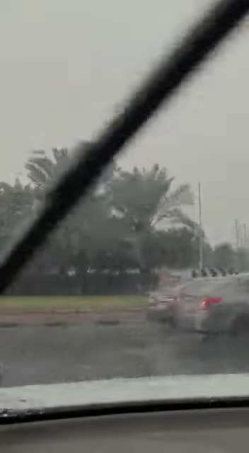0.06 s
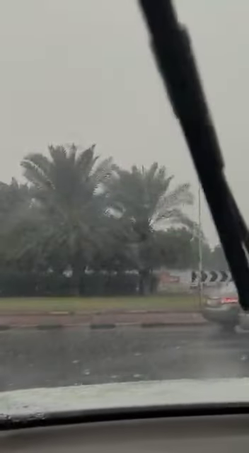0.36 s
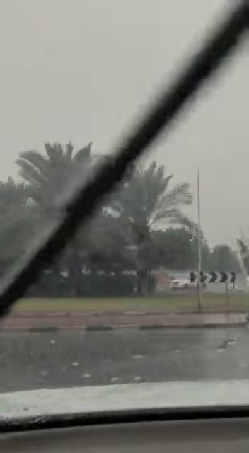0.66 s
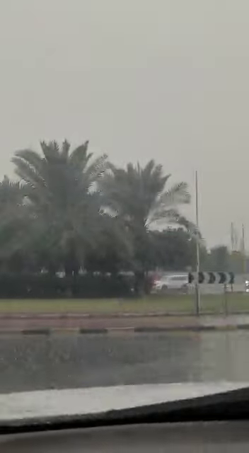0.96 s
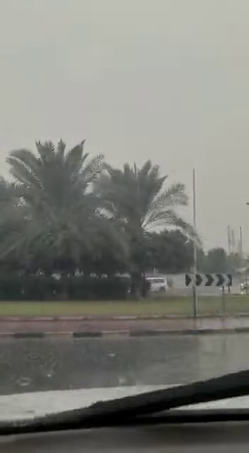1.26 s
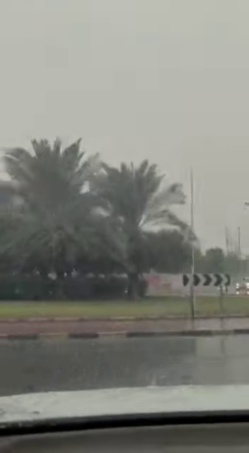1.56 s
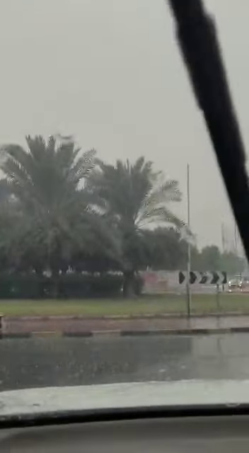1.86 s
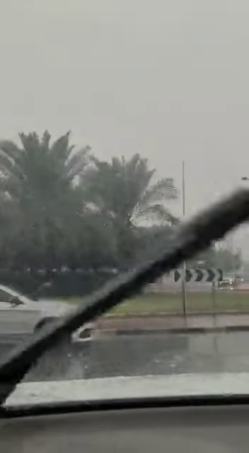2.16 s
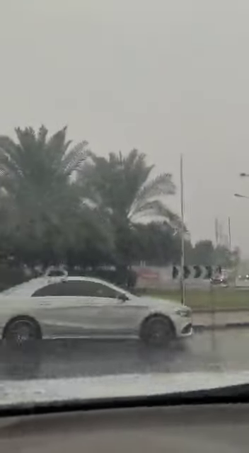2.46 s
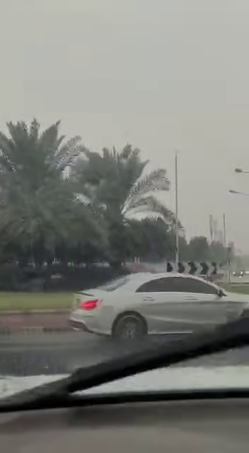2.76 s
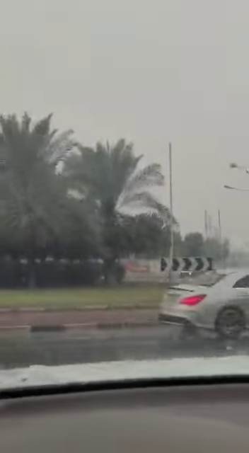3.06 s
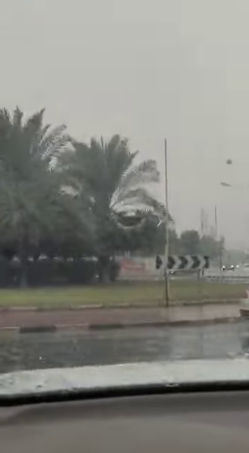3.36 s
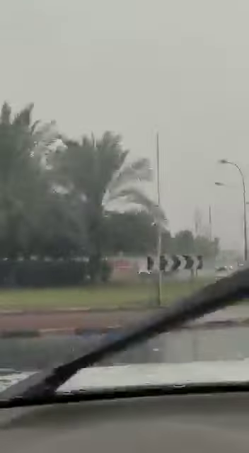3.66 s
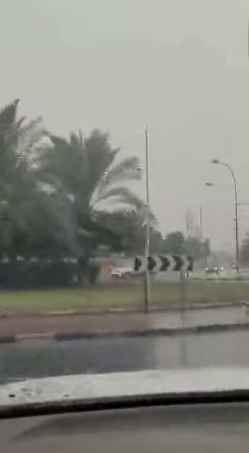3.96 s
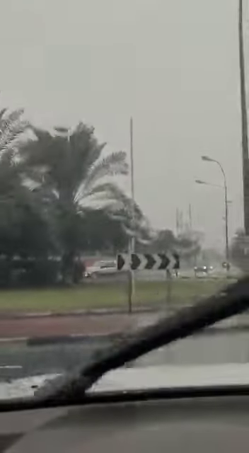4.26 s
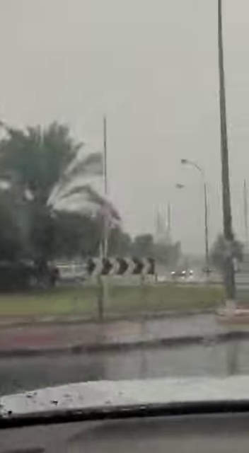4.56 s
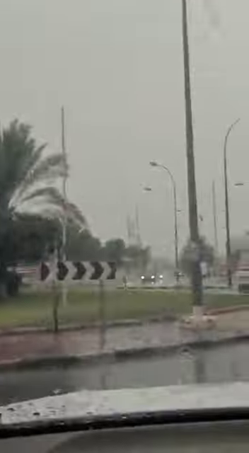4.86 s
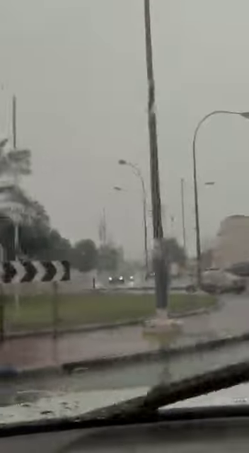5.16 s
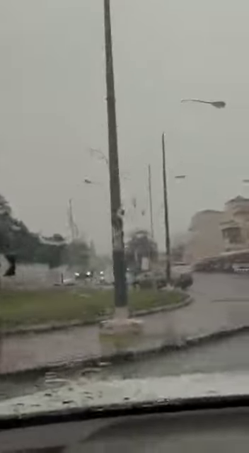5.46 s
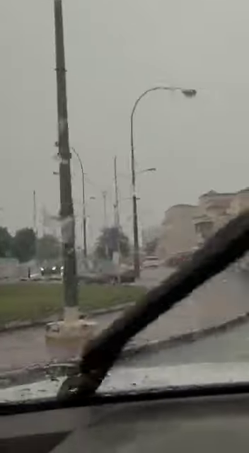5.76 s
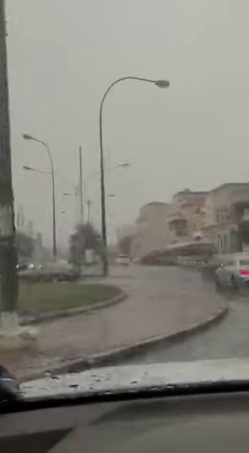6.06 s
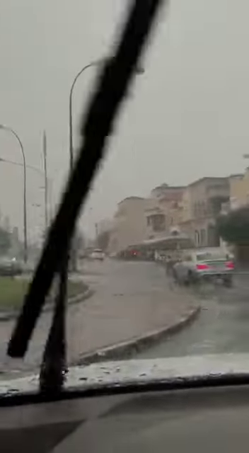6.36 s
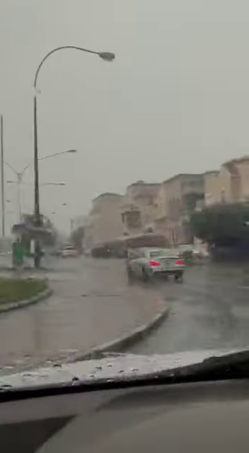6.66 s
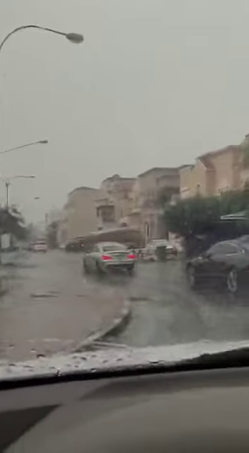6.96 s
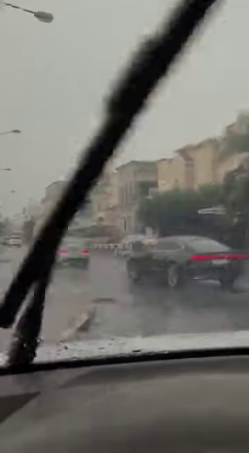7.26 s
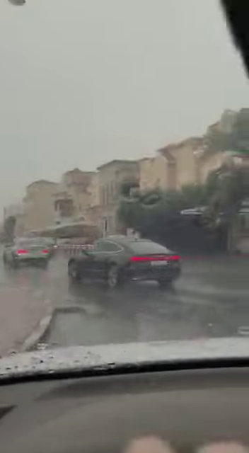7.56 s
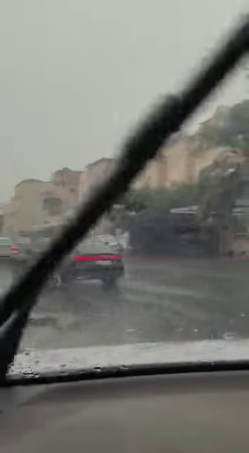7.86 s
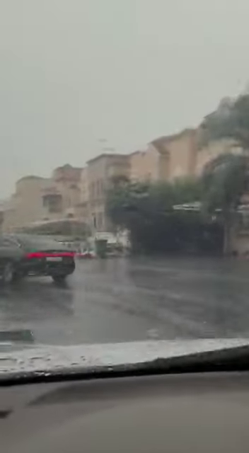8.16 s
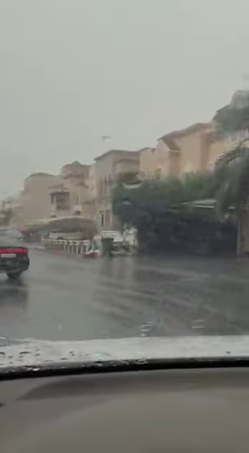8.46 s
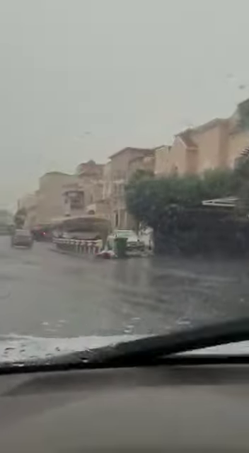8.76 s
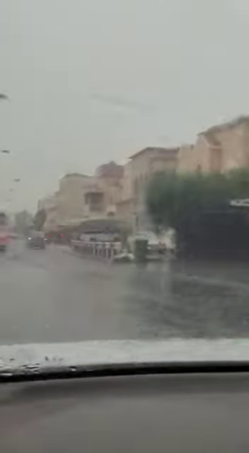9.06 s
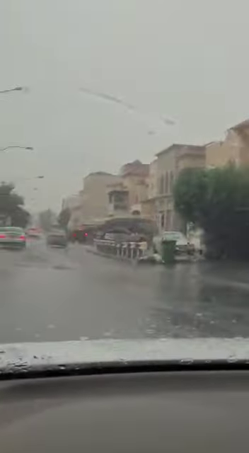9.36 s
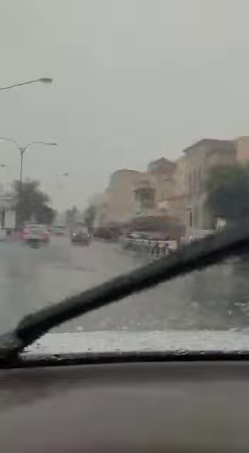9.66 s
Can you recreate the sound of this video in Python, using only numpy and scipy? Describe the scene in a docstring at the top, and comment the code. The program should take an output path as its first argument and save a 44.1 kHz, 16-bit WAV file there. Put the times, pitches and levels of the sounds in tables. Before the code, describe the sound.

Heavy rain drums on the roof of a car and patters on the windshield, heard close up inside the padded cabin. Wipers thud at each end of their sweep over a deep idling engine. The car then pulls away and a low tire boom grows. The wipers occasionally knock, chirp and scrub, a few small plastic clicks sound nearby, and a faint hiss of spray passes as the rain continues.

```python
"""Heavy rain from inside a car at a roundabout, on a close pair of microphones in the padded cabin.
At first the engine idles; drops drum on the lined roof overhead and patter on the windscreen, and the
wipers thud at each end of their sweep. From about 2.5 s the car pulls away and the tyre boom grows.
After 3 s the wiper linkage knocks at some turns and the rubber blades chirp or scrub. Water washes
over the glass near 4 s, and fine spray swells near 8 s while the rain drums on."""
import sys
import numpy as np
from scipy import signal
from scipy.fft import rfft, irfft, next_fast_len
from scipy.io import wavfile
from scipy.ndimage import uniform_filter1d

SR = 44100
rng = np.random.default_rng(int(sys.argv[2]) if len(sys.argv) > 2 else 0)


def output_pcm(signal):
    """Save a mono or channel-first signal as 16-bit PCM at the path in sys.argv[1].

    Samples are clipped to [-1, 1] before scaling.
    """
    pcm = np.clip(np.atleast_2d(signal).T, -1, 1) * 32767
    wavfile.write(sys.argv[1], SR, np.round(pcm).astype(np.int16))


N = 436590
T = np.arange(N) / SR
HIT_SAMPLES = 8192


# how hard the rain falls, a base level for roof and glass: time_s, level_db
RAIN_STRENGTH = [(0, -46.5), (1.3, -48), (1.7, -48), (2.7, -48.5), (3.3, -48), (4.1, -47), (4.3, -49),
                 (5.9, -48.5), (6.15, -47), (6.4, -48.5), (7.7, -48.5), (8.3, -48.5), (9.9, -50)]
# modes of the roof panel: pitch_hz, width_hz, gain_db
ROOF_PANEL = [(248.3, 56, 1), (297.3, 60, 0.5), (350, 57, 1.5), (500, 56, 1), (649, 126, -6.5),
              (720, 27.2, 2.5), (802, 53, -5), (858, 128, -6), (1175, 1290, -12)]
def roof_rain():
    """Overhead, dense drops ring the roof panel, dulled by its lining."""
    rain_db = in_time(RAIN_STRENGTH)
    flutter_db = 1.3 * drift(rate_hz=5.9)
    drops = shower(per_s=1000, spread_db=3.4, biggest_db=14, t60_s=.05, direct_db=-4)
    drumming = soften(resonate(drops, ROOF_PANEL), 1800)
    return from_db(rain_db + 11 + flutter_db) * rms_one(drumming)


# heavy drops overhead: time_s, peak_db, pitch_hz
ROOF_TAPS = [(.012, -24, 715), (.106, -39, 710), (.371, -22.5, 690), (.622, -26, 730), (.745, -25, 740),
             (.932, -23, 700), (1.507, -27, 490), (2.04, -23.5, 500), (2.273, -23, 710), (2.74, -20.5, 486),
             (5.06, -22.5, 490), (5.143, -29.5, 520), (5.318, -27.5, 497), (5.799, -22.5, 560),
             (6.205, -25, 704), (6.664, -29, 780), (7.154, -23, 540), (7.198, -27, 560), (7.52, -28, 596),
             (7.71, -24.5, 720), (8.198, -27, 470), (8.231, -22, 510), (8.73, -27, 600), (9.069, -27, 730),
             (9.765, -25, 710)]
def roof_drops(rise_s=.0038):
    """Heavy drops stand out from the drumming as short hollow taps."""
    out = np.zeros((2, N))
    for s, db, hz in ROOF_TAPS:
        modes = struck(ROOF_PANEL, hz, db_per_octave=8.5)
        tap = soften(resonate(shove(rise_s), modes), 2100)
        add(out, s - 2 * rise_s, at_peak(tap, db))
    return out


# broad notes of windscreen and windows: pitch_hz, width_hz, gain_db
GLASS_MODES = [(1000, 430, 1), (1400, 390, -1.5), (1580, 290, -1), (2310, 410, -1), (2715, 610, -2),
               (3640, 3440, -8)]
# the upper three notes against the lower three: time_s, gain_db
GLASS_TILT = [(0, -1), (1, -0.2), (2, 1), (2.6, -0.5), (3, -0.5), (4.3, 0.5), (6.5, 0), (8, -1), (9, -1.3),
              (9.9, 0.8)]
def glass_rain(clumps):
    """Every drop shakes the whole pane, and where it lands decides which note rings most."""
    upper_db = in_time(GLASS_TILT)
    pane = shower(per_s=520, spread_db=6, biggest_db=15, t60_s=.093, direct_db=-9.5)
    patter = 0
    for k, mode in enumerate(GLASS_MODES):
        drops = shower(per_s=430, spread_db=3.6, biggest_db=14, t60_s=.05, direct_db=-1)
        note = resonate(drops + (-1) ** k * pane, [mode])
        patter = patter + from_db(upper_db * (k > 2)) * note
    level_db = in_time(RAIN_STRENGTH) + 5 + 1.12 * clumps
    return from_db(level_db) * rms_one(soften(patter, 4200))


# fat drops on the windscreen: time_s, relative_peak_db, pitch_hz
FAT_DROPS = [(.008, -28, 2300), (0.169, -36, 2600), (.344, -29, 2500), (.42, -31, 2600), (.615, -27, 1300),
             (.675, -42, 2600), (.745, -30, 2500), (.803, -29, 2400), (.835, -33, 2600), (.925, -28, 1500),
             (1.02, -29.5, 2600), (1.055, -36, 2800), (1.077, -31, 3500), (1.112, -30, 2600),
             (1.255, -34, 2600), (1.372, -36, 2600), (1.5, -31, 2600), (1.556, -26.5, 2800),
             (1.646, -27.5, 2420), (1.741, -28, 2780), (1.933, -27.5, 2700), (2.072, -26, 1200),
             (2.091, -31, 3300), (2.213, -29, 2600), (2.328, -30, 3000), (2.392, -30.5, 2600),
             (2.499, -28.5, 2800), (2.535, -31, 2600), (2.895, -30.5, 2800), (3.012, -35, 2600),
             (3.078, -31, 2180), (3.167, -28, 2600), (3.24, -30, 2600), (3.32, -27, 2800),
             (3.355, -29, 2600), (3.455, -28, 2600), (3.484, -28.5, 2800), (4.097, -25.5, 3400),
             (4.65, -28.5, 2000), (4.81, -27, 1500), (5.011, -26, 2800), (5.164, -30, 2500),
             (5.802, -28, 1200), (6.051, -28, 2400), (6.211, -29, 1800), (6.855, -26, 2600),
             (7.17, -31, 1400), (7.71, -33, 3800), (8.543, -30, 3480), (8.755, -33, 3500),
             (8.911, -32, 3500), (9.062, -30, 1900), (9.789, -30, 1900)]
def splats(rise_s=.0048):
    """A fat drop bursts and rings the pane, and its droplets fall back just after."""
    out = np.zeros((2, N))
    for s, db, hz in FAT_DROPS:
        spatter = shove(rise_s) + from_db(-9) * shove(rise_s=.016)
        modes = struck(GLASS_MODES, hz, db_per_octave=2.5)
        burst = soften(resonate(spatter, modes), 4700)
        add(out, s - rise_s, at_peak(burst, db - 1.5))
    return out


# fine splashes on the windscreen: time_s, level_db
SPLASH_LEVEL = [(0, -51), (1.4, -54), (2.1, -50.5), (2.7, -53.5), (3.3, -50), (3.8, -52), (4.1, -51),
                (4.3, -54), (4.8, -51.5), (5.8, -50.5), (6.1, -48), (6.4, -53), (7.3, -47.5), (7.47, -51),
                (7.65, -50.5), (8.3, -49), (9.9, -50)]
# spectrum of their spatter: frequency_hz, gain_db
SPLASH_SPECTRUM = [(1200, -9.5), (2500, 3), (4300, 7), (5500, 6), (6900, -1.5), (8100, 3.5), (9300, -1.5),
                   (11000, -2.5), (13000, -5), (16000, -8.5)]
# snap of a drop near the microphones: frequency_hz, gain_db
TICK_SPECTRUM = [(2000, -14), (6500, -5), (9000, -1), (12000, 0), (16000, -4.5)]
def splashes(clumps):
    """Fine splashes come in quick flurries; the nearest keep their treble and tick separately."""
    level_db = in_time(SPLASH_LEVEL) + 1.52 * clumps + 1.47 * drift(rate_hz=12)
    drops = shower(per_s=610, spread_db=3, biggest_db=8, t60_s=.079, direct_db=-3.5)
    near_drops = shower(per_s=100, spread_db=5.5, biggest_db=11.5, t60_s=.06, direct_db=-1)
    spatter = rms_one(colour(drops, SPLASH_SPECTRUM))
    ticks = from_db(2 * drift(rate_hz=16)) * rms_one(colour(near_drops, TICK_SPECTRUM))
    return from_db(level_db) * (spatter + .37 * ticks)


# single drops on the glass close by: start_s, relative_peak_db
NEAR_TICKS = [(.925, -34), (2.711, -36), (4.339, -34), (4.665, -33), (5.759, -29), (6.474, -35),
              (6.536, -29), (6.625, -31), (6.651, -28), (8.069, -32), (8.792, -31), (8.988, -33),
              (9.491, -35)]
def glass_ticks():
    """Drops close to the microphones arrive as sharp ticks with hardly any tail."""
    out = np.zeros((2, N))
    for s, db in NEAR_TICKS:
        tick = colour(impact(t60_s=.01, direct_db=1), TICK_SPECTRUM)
        add(out, s, at_peak(tick, db + 6))
    return out


# a few thuds at each end of the wipers' sweep: time_s, boom_db, scuttle_db
WIPER_THUDS = [(.381, -24.5, -33), (.497, -25, -36), (.518, -21, -26), (0.536, -24.5, -41),
               (.571, -30.5, -44), (1.097, -22.5, -27), (1.133, -23, -32), (1.152, -20.5, -34),
               (1.222, -27, -27), (1.247, -27.5, -34), (1.304, -30, -39), (1.815, -22.5, -30.5),
               (1.947, -27, -27), (1.978, -24.5, -34), (2.014, -24, -37), (2.075, -29, -44),
               (2.523, -18, -29), (2.55, -20.5, -35), (2.592, -17, -34), (2.657, -26, -37),
               (2.682, -27, -41), (3.236, -34, -25), (3.284, -15.5, -26), (3.303, -21, -27),
               (3.345, -27, -33.5), (3.92, -27, -41), (3.945, -27, -27.5), (3.985, -20, -35.5),
               (4.008, -25, -25.5), (4.026, -19.5, -33), (4.092, -26.5, -28), (4.671, -34, -30.5),
               (4.687, -20.5, -39), (4.712, -26, -27.5), (4.742, -21, -28.5), (4.796, -20.5, -46),
               (4.817, -28.5, -38), (4.893, -28.5, -44), (5.399, -27.5, -28.5), (5.472, -21, -30.5),
               (5.549, -20, -35), (5.578, -25, -40), (6.093, -22.5, -28), (6.147, -22, -23),
               (6.18, -21.5, -29), (6.229, -30, -37), (6.272, -26, -44), (6.823, -21.5, -26),
               (6.849, -25, -28), (6.873, -19.5, -34), (6.905, -17.5, -25), (6.959, -27, -36),
               (7.542, -17.5, -29), (7.591, -33, -27), (7.606, -21.5, -30), (7.627, -23, -28),
               (7.643, -25, -31), (7.686, -23.5, -33), (8.287, -22.5, -37), (8.331, -21.5, -31),
               (8.348, -16, -27.5), (8.384, -24, -30), (8.406, -19, -31), (8.666, -25, -36),
               (8.804, -20, -37), (9.268, -31, -30.5), (9.307, -26, -37), (9.401, -26, -29),
               (9.416, -25.5, -38)]
# three modes of the cabin air, then three of the scuttle under the wipers: pitch_hz, width_hz, gain_db
CABIN_AND_SCUTTLE = [(61.5, 19, -5.5), (120.6, 38.4, 1.5), (159.5, 28, 1.5), (227.7, 27.7, -3.5),
                     (276.6, 38.5, -4.5), (344.3, 52, -7.5)]
def wipers(rise_s=.0056):
    """The blades roll over and the arms settle: soft shoves boom in the cabin and ring the scuttle."""
    out = np.zeros((2, N))
    for s, boom_db, scuttle_db in WIPER_THUDS:
        judder = shove(rise_s)
        boom = soften(resonate(judder, CABIN_AND_SCUTTLE[:3]), 230)
        scuttle = soften(resonate(judder, CABIN_AND_SCUTTLE[3:]), 390)
        add(out, s - 1.926 * rise_s, at_level(boom, boom_db) + at_level(scuttle, scuttle_db))
    return out


# the wiper linkage knocks on the body: time_s, note_db, note_hz, clack_db, clack_hz
LINKAGE_KNOCKS = [(3.278, -25, 470, -35.5, 1000), (4.041, -32, 490, -49, 1100),
                  (4.738, -38, 490, -45, 1100), (6.147, -27, 467, -41, 1250),
                  (7.586, -25.5, 490, -31.5, 1350), (7.632, -34.5, 487, -50, 900)]
# modes of the linkage: pitch_hz, width_hz, gain_db
LINKAGE_MODES = [(694, 160, 11), (930, 240, 1), (1330, 220, 4.5), (1860, 560, -4)]
def linkage(note_rise_s=.006, clack_rise_s=.0052):
    """The linkage takes up its slack with a hard clack, then the body answers with a broad note."""
    out = np.zeros((2, N))
    for s, note_db, note_hz, clack_db, clack_hz in LINKAGE_KNOCKS:
        body_modes = [(note_hz, 105, 0), (312, 55, -2)]
        note = soften(resonate(shove(note_rise_s), body_modes), 890)
        clack_modes = struck(LINKAGE_MODES, clack_hz, db_per_octave=12)
        clack = soften(resonate(shove(clack_rise_s), clack_modes), 2600)
        add(out, s - note_rise_s / 2, at_level(note, note_db))
        add(out, s - 1.7 * clack_rise_s, at_level(clack, clack_db))
    return out


# the engine, idling and then under load: time_s, relative_level_db
ENGINE_LEVEL = [(0, -33), (.9, -37.5), (1.3, -30), (1.7, -38.5), (2.4, -40.5), (3.05, -29.5), (3.6, -34),
                (4.0, -30.5), (4.6, -30), (5.5, -32.5), (6.5, -27), (7.3, -32), (8.6, -30), (9.9, -31)]
# its spectrum inside the cabin: frequency_hz, gain_db
ENGINE_SPECTRUM = [(12, -62), (24, -18.5), (32, 2.5), (38, 7.5), (47, 7), (62, 8), (80, 0), (110, -5.5),
                   (200, -52.5)]
def engine():
    """The engine reaches the cabin as a deep, uneven rumble from below."""
    rumble = rms_one(colour(noise(), ENGINE_SPECTRUM))
    return from_db(in_time(ENGINE_LEVEL) + 3.5) * rumble


# tyres on the road below: time_s, relative_level_db
TYRE_LEVEL = [(0, -41), (2.4, -42), (2.8, -37.5), (5.0, -34), (6.3, -32.5), (7.2, -34.5), (8.8, -34),
              (9.9, -34.5)]
# cabin booms that they excite: pitch_hz, width_hz, gain_db
TYRE_MODES = [(97.6, 27.7, -1.5), (126.4, 12.9, 1), (158.9, 8.6, -3), (251.5, 58, -11.5), (294, 81, -17)]
def tyres():
    """Rolling tyres make the cabin boom, louder as the car gathers speed."""
    boom = rms_one(resonate(noise(), TYRE_MODES))
    return soften(from_db(in_time(TYRE_LEVEL) + 6.5) * boom, 620)


# chirps of the blades: time_s, level_db, start_pitch_hz
BLADE_CHIRPS = [(3.204, -39, 952), (4.646, -36.5, 910), (4.731, -39, 800)]
def blade_chirps(rise_s=.0071, fall_octaves_per_s=20):
    """A blade drags as it flips over and gives a short, rough, falling chirp."""
    out = np.zeros((2, N))
    age = np.arange(HIT_SAMPLES) / SR
    for s, db, hz in BLADE_CHIRPS:
        pitch_hz = hz * 2 ** (-fall_octaves_per_s * age)
        phase = 2 * np.pi * np.cumsum(pitch_hz) / SR
        grip = soften(shove(rise_s) + 1j * shove(rise_s), 88)
        chirp = np.real(grip * np.exp(1j * phase))  # a narrow band of noise around the pitch
        add(out, s - rise_s / 2, at_level(chirp, db))
    return out


# scrubs on the windscreen: centre_s, level_db, half_length_s
BLADE_SCRUBS = [(4.072, -48, .05), (4.786, -45, .08), (6.14, -42, 0.11), (7.663, -47, 0.089)]
# notes of rubber on glass: pitch_hz, width_hz, gain_db
RUBBER_MODES = [(520, 110, 2), (760, 260, 3), (1200, 540, -3)]
def blade_scrubs():
    """Slowing for a turn, wet rubber crosses the glass in a run of tiny slips."""
    slips = shower(per_s=400, spread_db=3, biggest_db=10, t60_s=.03, direct_db=0)
    scrub = soften(resonate(slips, RUBBER_MODES), 2200)
    return sum(swell(*row) for row in BLADE_SCRUBS) * rms_one(scrub)


# hiss of fine spray: frequency_hz, gain_db
SPRAY_SPECTRUM = [(4000, -16), (9000, -6), (15000, -4)]
def spray():
    """A mist of tiny droplets swells and passes."""
    mist = rms_one(colour(noise(), SPRAY_SPECTRUM))
    return swell(centre_s=7.74, level_db=-49.5, half_length_s=.21) * mist


def wash():
    """A sheet of water hisses across the windscreen."""
    water = soften(resonate(noise(), [(5070, 1500, 0)]), 6500)
    return swell(centre_s=3.83, level_db=-53.5, half_length_s=.2) * rms_one(water)


# clicks near the microphones: start_s, peak_db (midway between left and right)
PLASTIC_CLICKS = [(3.645, -34), (3.932, -23.5), (3.992, -35), (9.431, -34)]
# their spectrum: frequency_hz, gain_db
CLICK_SPECTRUM = [(1000, -20), (3200, -1), (3900, 13), (5000, 1), (8000, 3.5), (12000, 3), (16000, -7)]
def cabin_clicks():
    """Small plastic clicks ring briefly, close by and to the left."""
    out = np.zeros((2, N))
    pan_db = np.array([[3], [-3]])
    for s, db in PLASTIC_CLICKS:
        snap = impact(t60_s=.034, direct_db=-16)
        click = colour(snap, CLICK_SPECTRUM) + resonate(snap, [(4000, 270, 10)])
        add(out, s, at_peak(click, db + pan_db))
    return out


# swishes near the microphones: centre_s, level_db, half_length_s
NEAR_SWISHES = [(1.1, -66, 0.88), (2.1, -54, 0.079), (2.34, -51, 0.065), (3.72, -56, 0.15),
                (9.45, -55, 0.028)]
# their spectrum: frequency_hz, gain_db
SWISH_SPECTRUM = [(1500, -33), (4500, 2), (7000, -17), (10000, -7), (16000, -7)]
def cabin_swishes():
    """Faint, thin swishes flicker as they come and go."""
    envelope = sum(swell(*row) for row in NEAR_SWISHES)
    flicker = from_db(2 * drift(rate_hz=25))
    return envelope * flicker * rms_one(colour(noise(), SWISH_SPECTRUM))


def shower(per_s, spread_db, biggest_db, t60_s, direct_db):
    """Drops of many sizes: each snaps at both microphones, then scatters into a brief cabin tail."""
    count = int(per_s * N / SR)
    left_at = rng.integers(0, N, count)
    size_db = np.minimum(spread_db * rng.exponential(1, count), biggest_db)
    size = from_db(size_db) * rng.choice([-1, 1], count)
    # drops land on either side, so they reach the right microphone a little earlier or later
    right_at = (left_at + rng.integers(-16, 17, count)) % N
    drops = np.array([np.bincount(at, size, N) for at in (left_at, right_at)])
    decay = from_db(-60 / (t60_s * SR)) ** 2
    tail_power = signal.lfilter([1 - decay], [1, -decay], drops ** 2 + 1e-18)
    return rms_one(from_db(direct_db) * drops + np.sqrt(tail_power) * noise())


def clumping(per_s=26, fade_s=.044):
    """Clumps of drops land suddenly and trail off, none far above the rest; spread 1."""
    landings = (rng.random(N) < per_s / SR) * rng.uniform(.3, 1, N)
    load = signal.lfilter([1], [1, -np.exp(-1 / (fade_s * SR))], landings + 1e-18)
    return rms_one(np.tanh(rms_one(load - load.mean()) / 2))


def impact(t60_s, direct_db):
    """One hit at both microphones: the direct snap and dense reflections that die fast."""
    out = noise(HIT_SAMPLES) * from_db(-60 * np.arange(HIT_SAMPLES) / SR / t60_s)
    out /= np.sqrt(np.sum(out ** 2, axis=1, keepdims=True))
    out[[0, 1], rng.integers(0, 24, 2)] += from_db(direct_db)
    return out


def shove(rise_s):
    """A yielding contact: a judder that swells for a moment and dies away."""
    age = np.arange(HIT_SAMPLES) / SR / rise_s
    return noise(HIT_SAMPLES) * age * np.exp(-age)


def struck(modes, note_hz, db_per_octave):
    """Where a hit lands decides the note: modes weaken with each octave away from it."""
    return [(hz, width, db - db_per_octave * abs(np.log2(hz / note_hz))) for hz, width, db in modes]


def resonate(x, modes):
    """Parallel resonances of alternating sign, each given as pitch_hz, width_hz, gain_db."""
    out = 0
    for k, (hz, width, db) in enumerate(modes):
        r = np.exp(-np.pi * width / SR)
        ring = signal.lfilter([1, 0, -1], [1, -2 * r * np.cos(2 * np.pi * hz / SR), r * r], x)
        out = out + (-1) ** k * from_db(db) * (1 - r * r) / 2 * ring
    return out


def colour(x, spectrum, causal=True):
    """Filter by a spectrum; the causal form lets nothing sound before its hit."""
    size = next_fast_len(x.shape[-1] // 2 + HIT_SAMPLES) * 2
    hz, db = np.transpose(spectrum)
    bin_hz = np.arange(size // 2 + 1) * SR / size
    gain = from_db(np.interp(np.log(bin_hz + 1), np.log(hz), db))
    if causal:  # minimum phase
        cepstrum = irfft(np.log(gain))
        cepstrum[1:size // 2] *= 2
        cepstrum[size // 2 + 1:] = 0
        gain = np.exp(rfft(cepstrum))
    return irfft(rfft(x, size) * gain)[..., :x.shape[-1]]


def soften(x, cutoff_hz):
    """Take the top off, as padding and rubber do."""
    return signal.sosfilt(signal.butter(2, cutoff_hz, fs=SR, output="sos"), x)


def drift(rate_hz):
    """A slow random wander with spread 1."""
    hop, settle = 40, 2000
    r = np.exp(-2 * np.pi * hop * rate_hz / SR)
    steps = rng.standard_normal(N // hop + settle + 2)
    slow = signal.lfilter([1], [1, -2 * r, r * r], steps)[settle:]
    return np.interp(np.arange(N) / hop, np.arange(len(slow)), rms_one(slow))


def noise(samples=N):
    """Independent white noise, left and right."""
    return rng.standard_normal((2, samples))


def swell(centre_s, level_db, half_length_s):
    """A bell-shaped rise and fall in gain."""
    return from_db(level_db) * np.exp(-((T - centre_s) / half_length_s) ** 2)


def in_time(rows):
    """A curve through points of time and value."""
    return np.interp(T, *np.transpose(rows))


def from_db(db):
    """Decibels to gain."""
    return 10 ** (np.asarray(db) / 20)


def rms_one(x):
    """Scale to unit power."""
    return x / np.sqrt(np.mean(x ** 2) + 1e-20)


def at_peak(x, db):
    """Scale a hit by its peak."""
    return from_db(db) * x / np.abs(x).max()


def at_level(x, db):
    """Scale a hit by its loudest 14 ms."""
    power = uniform_filter1d(x.mean(axis=0) ** 2, size=600)
    return from_db(db) * x / np.sqrt(power.max())


def add(out, start_s, sound):
    """Mix a sound in at a time."""
    at = max(round(start_s * SR), 0)
    out[:, at:at + sound.shape[-1]] += sound[..., :max(N - at, 0)]


# side against mid at the microphone pair: frequency_hz, gain_db
STEREO_WIDTH = [(40, -8.5), (140, -26), (210, -23), (330, -5), (500, -6), (770, -2), (1220, -3), (2000, -2),
                (3500, -0.5)]
# response of the right microphone: frequency_hz, gain_db
RIGHT_RESPONSE = [(30, 3.6), (60, 2.2), (100, .6), (300, -.7), (750, .3), (1200, -1), (2700, -1.3),
                  (4500, 0), (6300, -1), (7200, -6), (8300, -19), (10000, -15), (12000, -10.5), (15500, -6)]
def microphone_pair(left, right, lag_s=.00027):
    """Long waves reach both alike; the right one hears later, shaded from the windscreen's treble."""
    mid = (left + right) / 2
    side = colour((left - right) / 2, STEREO_WIDTH, causal=False)
    shaded = colour(mid - side, RIGHT_RESPONSE, causal=False)
    return np.array([mid + side, np.roll(shaded, round(lag_s * SR))])


def scene():
    """Rain, car and wipers as heard in the cabin, with small noises close to the microphones."""
    clumps = clumping()
    rain = roof_rain() + glass_rain(clumps) + splashes(clumps)
    water = rain + roof_drops() + splats() + glass_ticks() + spray() + wash()
    car = engine() + tyres() + wipers() + linkage() + blade_scrubs() + blade_chirps()
    left, right = water + car
    return microphone_pair(left, right) + cabin_swishes() + cabin_clicks()


def record(dry):
    """The top is cut steeply above 15850 Hz."""
    return signal.sosfilt(signal.ellip(12, .1, 90, 15850, fs=SR, output="sos"), dry)


dry = scene()
out = record(dry)
output_pcm(out)
```